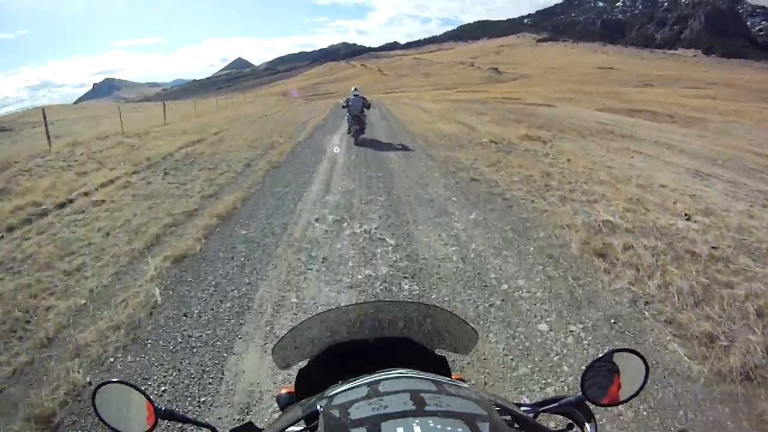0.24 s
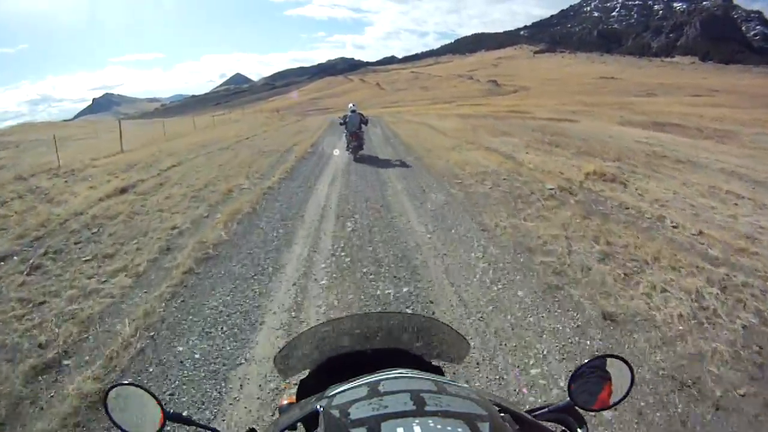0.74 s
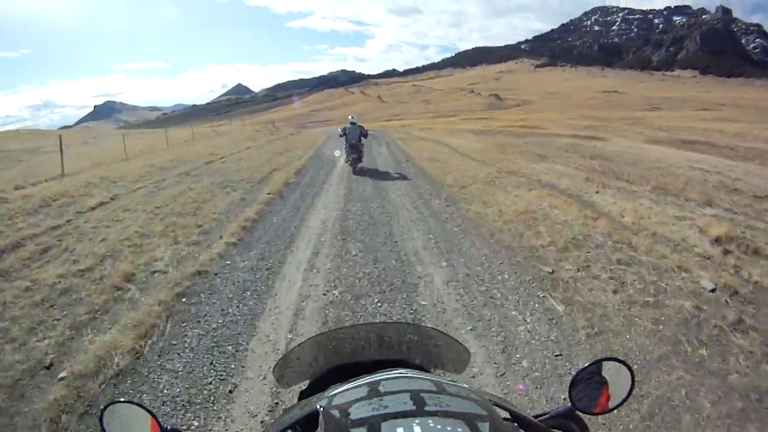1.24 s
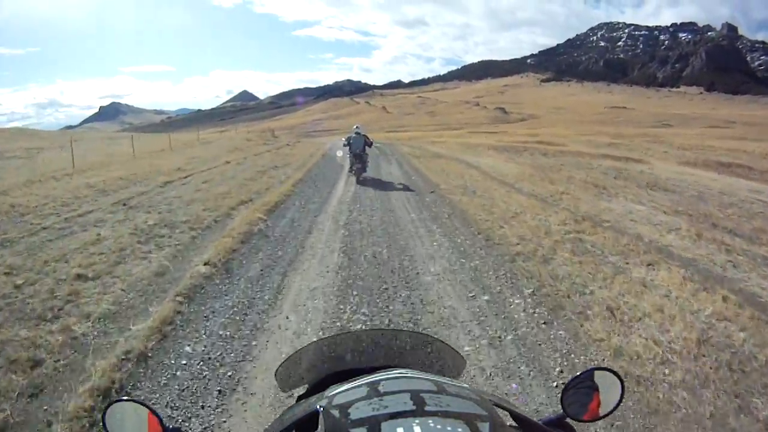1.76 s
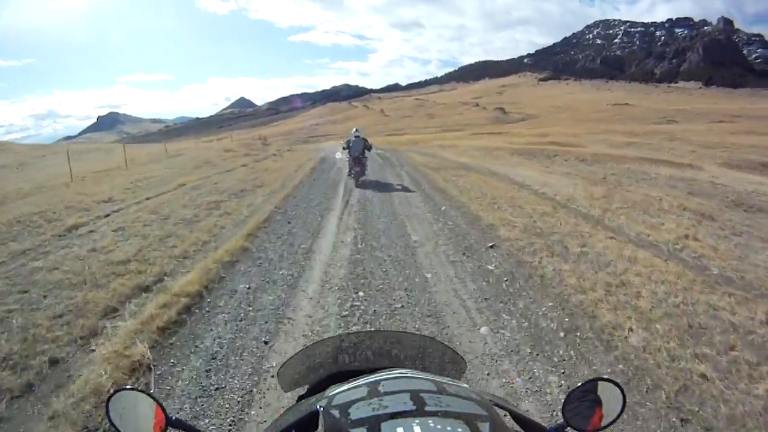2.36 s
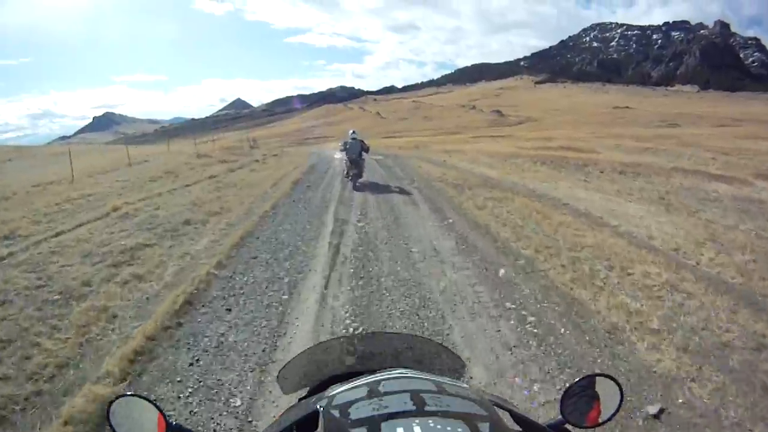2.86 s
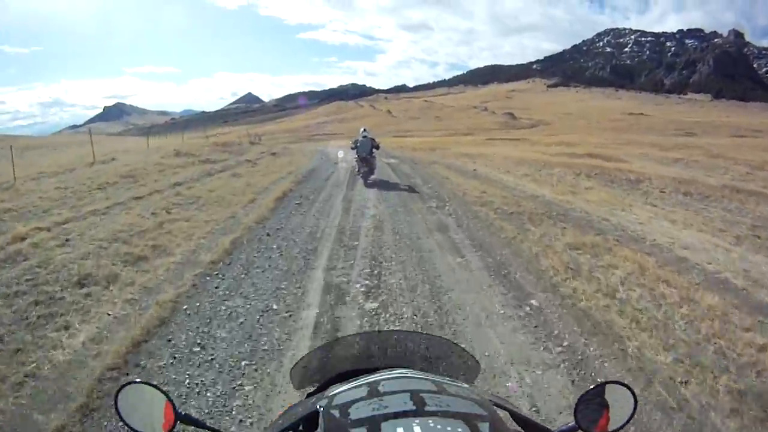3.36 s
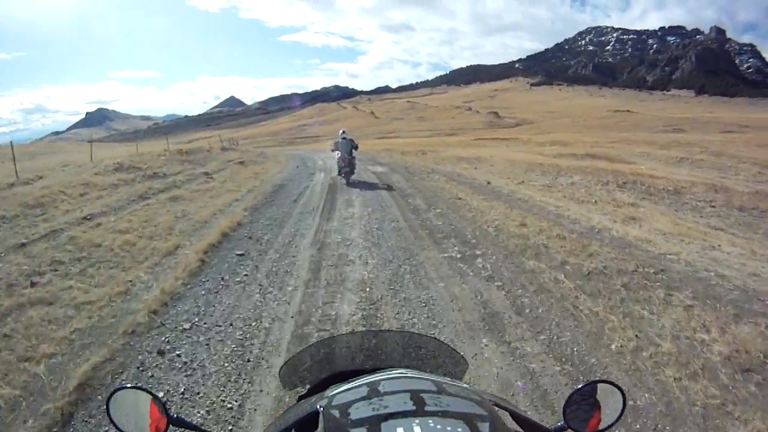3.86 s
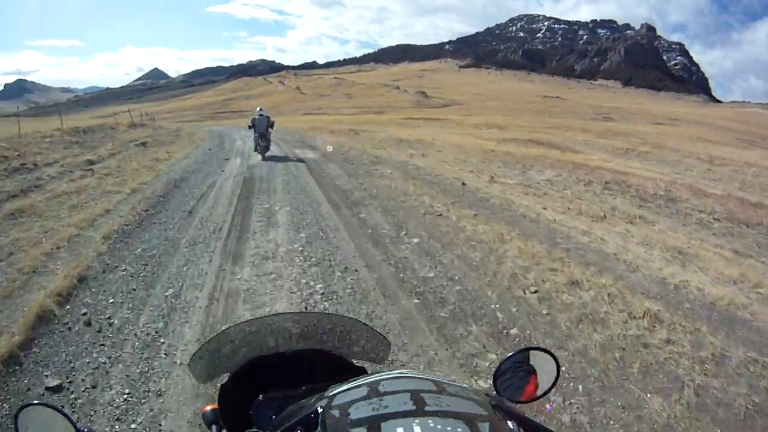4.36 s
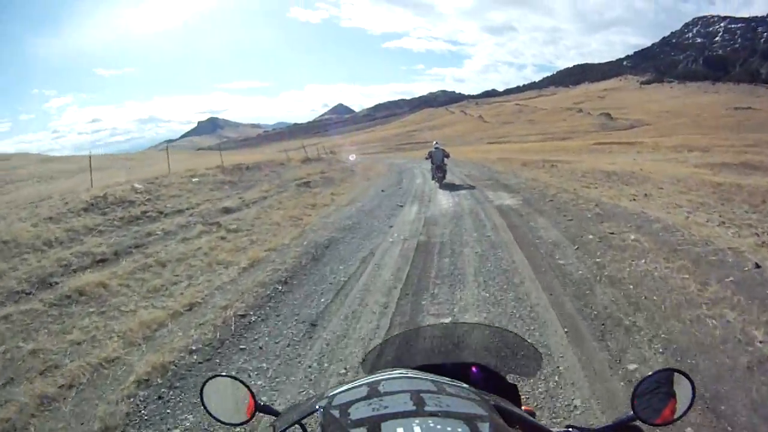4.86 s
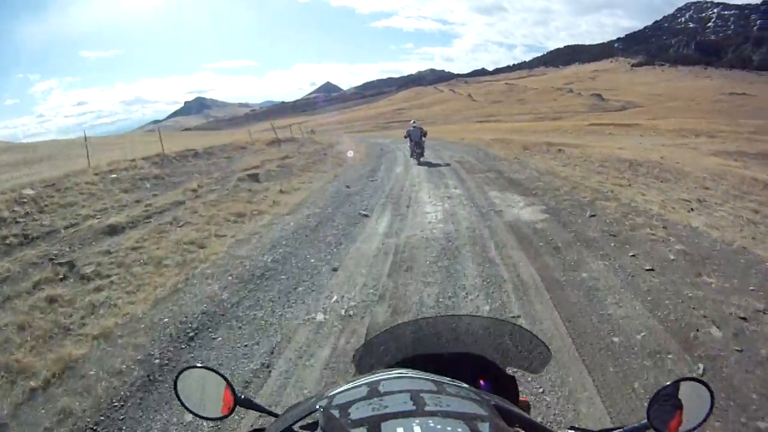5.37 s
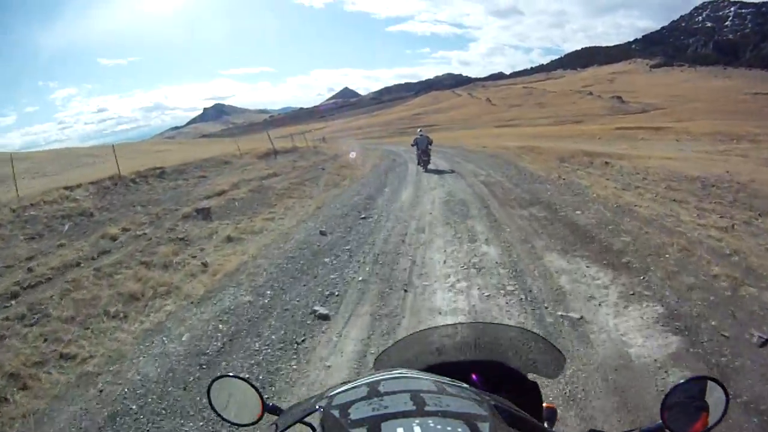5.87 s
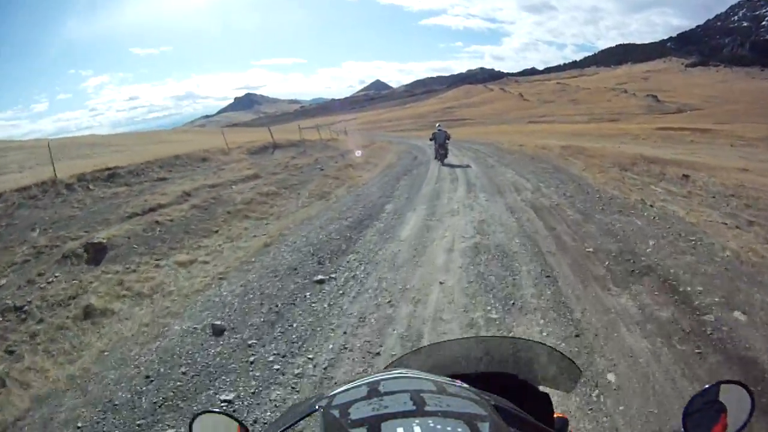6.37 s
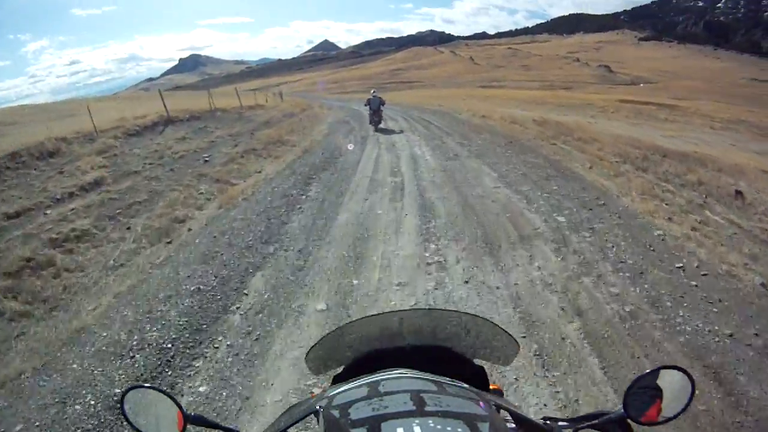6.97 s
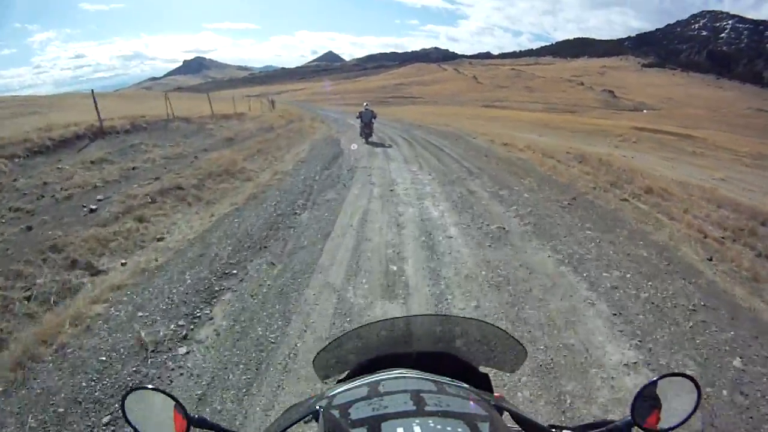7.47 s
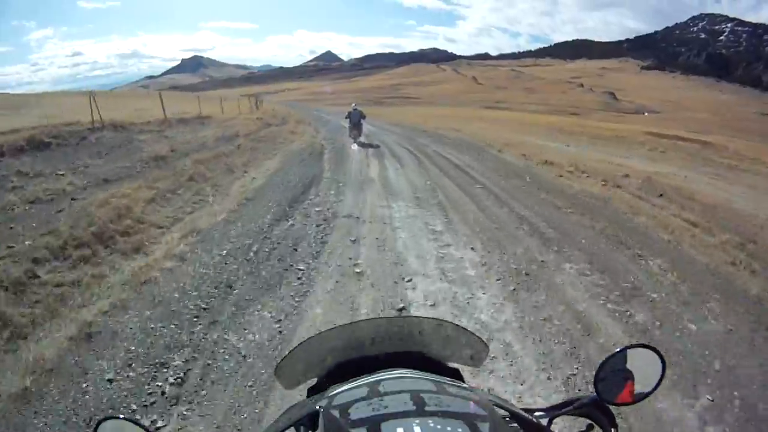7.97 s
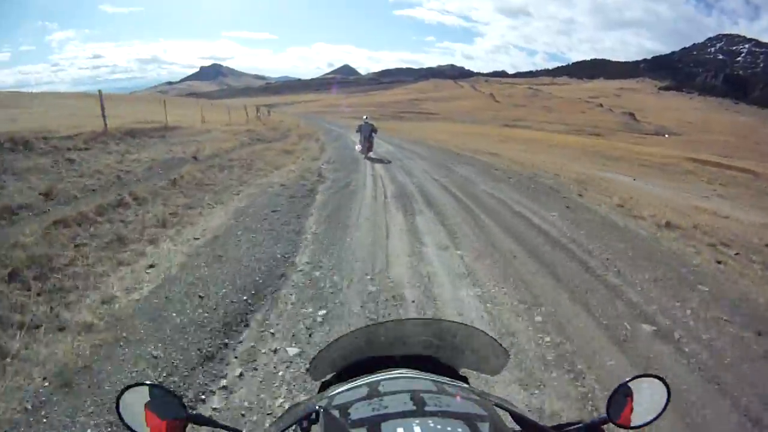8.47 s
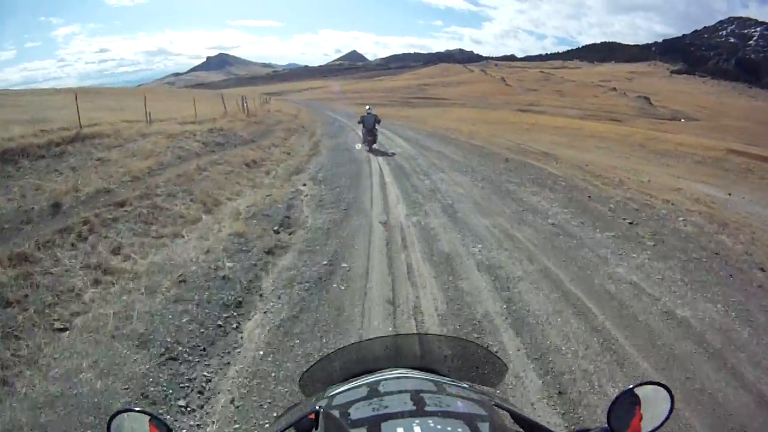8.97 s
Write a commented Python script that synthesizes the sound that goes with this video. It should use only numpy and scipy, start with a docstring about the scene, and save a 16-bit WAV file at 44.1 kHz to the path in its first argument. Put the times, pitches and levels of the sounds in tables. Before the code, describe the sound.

A single-cylinder motorcycle coasts with burbling, missed beats, then thumps harder through three barking throttle bursts over crunching gravel, heard from the rider's seat.

```python
"""On a gravel road in open country, from the rider's seat of a rolling single-cylinder motorcycle.
Close by, each four-stroke engine cycle gulps air in one thump that rings the intake duct and airbox;
it coasts with whining gears, burble and missed beats, then three throttle twists add a hard bark.
Under it the tyres crunch and flick stones, the bodywork drones and wind buffets the microphone.
A small camera turns its gain down under the thumps and clips the peaks."""
import sys
import numpy as np
from scipy import signal
from scipy.fft import rfft, irfft
from scipy.io import wavfile
from scipy.ndimage import uniform_filter1d

SR = 44100
rng = np.random.default_rng(int(sys.argv[2]) if len(sys.argv) > 2 else 0)


def dump(signal):
    """Clip the signal to [-1, 1] and save it as 16-bit WAV at the path in sys.argv[1]."""
    limited = np.clip(np.atleast_2d(signal).T, -1, 1)
    pcm = np.round(limited * 32767).astype(np.int16)
    wavfile.write(sys.argv[1], SR, pcm)


N = 406602

# Levels in the tables are those ahead of the camera's limiter.
# wind and rough road at the microphone: time_s, level_db
RUMBLE_LEVEL = [(0, -24), (3.0, -25), (4.3, -28.5), (6.2, -28), (7.2, -27.5), (8.4, -26), (8.75, -17.5),
                (9.22, -20.5)]
# its spectrum: frequency_hz, relative_density_db
RUMBLE_COLOUR = [(15, -9), (30, -3.5), (45, -4.5), (70, -4), (110, -2), (165, -9.5), (210, -12),
                 (280, -8.5), (400, -15), (800, -44.5)]
# drone of the bodywork: time_s, level_db
DRONE_LEVEL = [(0, -32.5), (1.85, -30.5), (2.2, -26.5), (2.7, -30.5), (5.9, -34), (6.5, -30.5), (7.8, -30),
               (9.22, -27.5)]
# its spectrum: frequency_hz, relative_density_db
DRONE_COLOUR = [(200, -14), (340, -12), (450, -0.5), (530, -2), (590, 3), (635, -3), (680, -10), (760, -10),
                (1000, -31)]
# spectrum of the tyre crunch: frequency_hz, relative_density_db
GRAVEL_COLOUR = [(300, -29.5), (700, 4.5), (920, 8), (1080, 4), (1300, 5), (1700, -1), (2300, -1),
                 (3000, -0.5), (3500, -10.5), (4100, -15), (5200, -14)]
# patches of loose gravel: centre_s, bell_width_s, added_db
LOOSE_PATCHES = [(1.18, 0.055, 3.5), (2.202, 0.31, 1.5), (3.99, 0.12, 6), (8.733, 0.08, 5.5)]
# stones flung against the bike: start_s, peak_db
STONES = [(0.2677, -19), (0.3686, -24.5), (0.4236, -21.5), (0.4777, -25), (0.7906, -22.5), (0.849, -26),
          (0.908, -31), (0.9335, -19.5), (2.9741, -22.5), (3.8561, -24), (3.9035, -34), (3.9402, -14),
          (3.995, -20), (4.0522, -22.5), (4.1165, -29), (4.2126, -23), (6.1064, -23), (6.3464, -37)]
# ring of metal under a stone: pitch_hz, mean_relative_level_db, t60_s
STONE_MODES = [(1250, -11, .008), (2150, 5, 0.0061), (2850, -15, .012), (3040, 12.5, 0.0096),
               (3700, -12, 0.0054), (4620, 1, 0.0065), (5000, -0.5, 0.012)]
# bumps that knock the bodywork: start_s, peak_db
KNOCKS = [(0.892, -19.5), (1.372, -14), (2.316, -23), (3.519, -11)]
# ring of the bodywork: pitch_hz, mean_relative_level_db, t60_s
PANEL_MODES = [(579, 5, 0.027), (726, -21, 0.03), (910, -11, 0.055), (1140, -10, 0.038), (1770, -19, 0.013)]
# gear whine while the wheel drives the engine: time_s, level_db
WHINE_LEVEL = [(0, -33.5), (1.3, -33.5), (1.8, -35), (2.5, -26.5), (3.0, -45), (4.2, -38.5), (4.6, -39),
               (9.22, -48)]
# gear partials: multiple_of_engine_cycle, relative_level_db ahead of the panel's boost
GEAR_ORDERS = [(34, -9), (35, -13), (36, 0), (37, -9), (38, -7), (44, -11), (48, -17)]
# exhaust burble, uneven about this level: time_s, mean_peak_db
BURBLE_LEVEL = [(0, -28.5), (1.15, -11), (2.2, -13), (4.0, -11.5), (4.5, -18), (8.3, -12.5), (9.22, -37)]
# engine speed: time_s, cycles_per_s
ENGINE_SPEED = [(0, 18.763), (.46, 17.437), (4.29, 13.264), (4.48, 14.8), (4.61, 13.005), (4.66, 14.8),
                (4.74, 13.86), (4.92, 14.728), (6.12, 16.052), (6.7, 17.37), (7.0, 17.431), (7.13, 18.388),
                (7.81, 19.82), (7.91, 21.005), (8.33, 23.176), (8.52, 23.574), (8.81, 21.64),
                (9.22, 22.864)]
# the rider's slow throttle setting: time_s, opening_0_to_1
THROTTLE = [(0, 0.06), (.85, 0.15), (1.1, 0), (2.4, 0), (3.2, 0.05), (4.1, 0.3), (4.42, 0.53), (6.2, 0.63),
            (6.45, .43), (7.8, 0.58), (8.35, 0.63), (8.6, 0.4), (8.8, 0.54), (9.22, 0.67)]
# twists of the grip on top of it: start_s, rise_s, hold_s, fall_s, added_opening_0_to_1
TWISTS = [(4.57, .04, .385, .04, .55), (6.66, .22, .345, .025, .41), (7.79, .2, .22, .23, .55)]
# missed beats: time_s, loss_db
MISSES = [(.22, 12), (.39, 20), (1.08, 9), (1.45, 15), (1.88, 26), (2.27, 3), (2.46, 19), (2.79, 15),
          (2.99, 14), (3.34, 4), (3.48, 17), (3.84, 14), (8.72, 9), (9.04, 12)]
# spectrum of the intake jet ahead of saturation: frequency_hz, relative_density_db
BARK_COLOUR = [(300, -33), (600, 7), (850, -0.5), (1200, 4), (1550, -1.5), (2050, 2), (2400, -4.5),
               (2900, 2), (3500, -6.5), (4200, -63), (5200, -30)]
# intake duct modes: mean_pitch_hz, relative_level_db, t60_s
DUCT_MODES = [(165, -17, .06), (286, 15.5, .042)]
# low ring of the airbox: time_s, level_db
BOOM_LEVEL = [(0, -4.5), (1.3, -3.5), (2.1, -3.5), (4.2, -2.5), (6.5, -1.5), (7.7, -4.5), (8.5, -11),
              (8.72, -5.5), (9.22, -0.5)]

MID_SPEED_HZ = 16   # engine cycles per second at which the speed laws add nothing
GRAVEL_DB, GRAVEL_DB_PER_OCTAVE = -40.5, 5   # at mid speed, and the rise as speed doubles
PANEL_HZ, PANEL_WIDTH_HZ, PANEL_BOOST_DB = 592, 14, 7.5   # resonance that takes up gear partials
CATCH_DB = 2.5   # the beat after a miss is this much stronger
THUMP_SHUT_DB, THUMP_OPEN_DB = -17.5, -1   # throttle shut and wide open
BARK_SHUT_DB, BARK_OPEN_DB = -35, -8   # likewise, the open level at mid speed
BARK_DB_PER_OCTAVE = 8   # rise of the open level as speed doubles
CRACK_DB, CRACK_T60_S = 6, .0016   # pressure front: level over the rasp with the throttle wide open
HOLD_BAND_HZ, CUTOFF_HZ = 5300, 15400   # camera low-passes, before and after the sample hold


def from_db(db):
    """Decibels to gain."""
    return 10 ** (np.asarray(db) / 20)


def rms_one(x):
    """Scale to unit rms."""
    return x / np.sqrt(np.mean(x ** 2) + 1e-20)


def in_time(rows):
    """Each column of a curve table, sample by sample."""
    s, *columns = np.transpose(rows)
    return [np.interp(np.arange(N) / SR, s, c) for c in columns]


def coloured(x, spectrum):
    """Give a signal a spectrum by a causal, minimum-phase filter; rms 1."""
    hz, db = np.transpose(spectrum)
    f = np.maximum(np.fft.rfftfreq(2 ** 14, 1 / SR), 1)
    octaves_beyond = np.abs(np.log2(f / np.clip(f, hz[0], hz[-1])))
    # past either end of the table: 12 dB per octave down, for four octaves
    shape_db = np.interp(np.log(f), np.log(hz), db) - 12 * np.minimum(octaves_beyond, 4)
    cepstrum = irfft(np.log(from_db(shape_db)))
    fold = np.r_[1, np.full(len(f) - 2, 2), 1, np.zeros(len(f) - 2)]   # makes it minimum phase
    impulse = irfft(np.exp(rfft(cepstrum * fold)))
    return rms_one(signal.fftconvolve(x, impulse)[:N])


def drift(rate_hz):
    """Smooth chance with spread 1, changing about rate_hz times a second."""
    spectrum = rfft(rng.standard_normal(N // 100 + 2))   # one point every 100 samples
    f = np.arange(len(spectrum)) * SR / N
    slow = rms_one(irfft(spectrum / (1 + (f / rate_hz) ** 2)))
    return np.interp(np.arange(N) / 100, np.arange(len(slow)), slow)


def bell(t, width):
    """A rounded pulse of height 1 at t = 0."""
    return np.exp(-.5 * (t / width) ** 2)


def dying(t, t60):
    """A decay that starts at t = 0 and falls 60 dB in t60 seconds."""
    return (t >= 0) * np.exp(-np.log(1000) * np.maximum(t, 0) / t60)


def rung(puff, t, hz, t60):
    """A cavity mode set ringing by a puff of air."""
    since = t - t[0]
    ring = dying(since, t60) * np.cos(2 * np.pi * hz * since)
    return np.convolve(puff / puff.sum(), ring)[:len(t)]


def add(track, start, sound):
    """Mix a sound into a track from the given sample on."""
    first, last = max(start, 0), min(start + len(sound), len(track))
    if last > first:
        track[first:last] += sound[first - start:last - start]


def rumble(lumpy_db=2.5):
    """Wind and the rough road buffet the microphone."""
    (rumble_db,) = in_time(RUMBLE_LEVEL)
    gain = from_db(rumble_db + lumpy_db * drift(37))
    return gain * coloured(rng.standard_normal(N), RUMBLE_COLOUR)


def bodywork(cycles, throb_db=3.5, throb_lead_cycles=0.021):
    """Engine and road shake the panels into a hollow drone that swells with every cycle."""
    (drone_db,) = in_time(DRONE_LEVEL)
    throb = throb_db * np.cos(2 * np.pi * (cycles + throb_lead_cycles))
    return from_db(drone_db + throb) * coloured(rng.standard_normal(N), DRONE_COLOUR)


def gravel(speed, grains_per_s=2500, size_db=0.5, hiss_share=0.9, patchy_db=2.5):
    """Countless small stones crack under the tyres, louder with speed and where they lie loose."""
    t = np.arange(N) / SR
    loose_db = sum(db * bell(t - s, width) for s, width, db in LOOSE_PATCHES)
    gravel_db = GRAVEL_DB + GRAVEL_DB_PER_OCTAVE * np.log2(speed / MID_SPEED_HZ) + loose_db
    sizes = from_db(size_db * np.minimum(rng.exponential(1, N), 5)) * rng.choice([-1, 1], N)
    grains = rms_one(sizes * (rng.random(N) < grains_per_s / SR))
    crunch = coloured(grains + hiss_share * rng.standard_normal(N), GRAVEL_COLOUR)
    return from_db(gravel_db + patchy_db * drift(28)) * crunch


def struck(hits, modes, scuff_t60, bounce_s, bounce_db):
    """Each hit scuffs and bounces three times, striking every mode with a strength of its own."""
    t, out = np.arange(SR // 12) / SR, np.zeros(N)
    for s, peak_db in hits:
        touches = np.r_[0, np.cumsum(bounce_s * rng.uniform(.5, 2, size=3))]
        scuffs = sum(from_db(bounce_db * k) * dying(t - at, scuff_t60) for k, at in enumerate(touches))
        contact = rng.standard_normal(len(t)) * scuffs
        body = 0
        for hz, db, t60 in modes:
            strength = from_db(db + rng.normal(0, 1))
            body = body + strength * dying(t, t60) * np.sin(2 * np.pi * hz * t)
        hit = signal.fftconvolve(contact, body)
        add(out, int(s * SR), from_db(peak_db) * hit / np.abs(hit).max())
    return out


def stones():
    """Flung stones tick against the metal, and bumps knock the panels."""
    ticks = struck(STONES, STONE_MODES, scuff_t60=0.019, bounce_s=0.0051, bounce_db=-5.5)
    knocks = struck(KNOCKS, PANEL_MODES, scuff_t60=0.0033, bounce_s=0.004, bounce_db=-5.5)
    return ticks + knocks


def whine(cycles, speed, whine_db, waver_rad=0.55):
    """Gear teeth mesh in step with the crank, wavering irregularly and swelling near a panel resonance."""
    teeth = 0
    for order, db in GEAR_ORDERS:
        boost_db = PANEL_BOOST_DB / (1 + ((order * speed - PANEL_HZ) / PANEL_WIDTH_HZ) ** 2)
        phase = 2 * np.pi * order * cycles + waver_rad * drift(5.1)
        teeth = teeth + from_db(db + boost_db) * np.sin(phase)
    return from_db(whine_db) * rms_one(teeth)


def burble(cycles, burble_db, pipe_hz=160, pipe_t60=0.049, puff_s=0.001, delay_s=0.0122,
           scatter_s=0.0014, uneven_db=3.0):
    """The exhaust answers each intake stroke with an uneven pop that rings the pipe."""
    t, out = np.arange(-SR // 200, SR // 10) / SR, np.zeros(N)
    pop = rung(bell(t[t < -t[0]], puff_s), t, pipe_hz, pipe_t60)
    pop = pop / np.abs(pop).max()
    firings = np.flatnonzero(np.diff(np.floor(cycles)))
    for at, chance in zip(firings, rng.standard_normal((len(firings), 2))):
        start = at + int((t[0] + delay_s + scatter_s * chance[0]) * SR)
        add(out, start, from_db(burble_db[at] + uneven_db * chance[1]) * pop)
    return out


def throttle_opening():
    """The rider's hand: a slow setting plus quick twists, each with a rise, a hold and a fall."""
    (opening,), t = in_time(THROTTLE), np.arange(N) / SR
    for start, rise, hold, fall, added in TWISTS:
        corners = start + np.cumsum([0, rise, hold, fall])
        opening = opening + added * np.interp(t, corners, [0, 1, 1, 0])
    return np.clip(opening, 0, 1)


def beat_strength(cycles, throttle, shut_scatter_db=7.3):
    """Strength of each beat in dB: uneven on a shut throttle; after a miss the engine catches harder."""
    beat = np.round(cycles).astype(int)
    missed_db = np.zeros(beat[-1] + 2)
    for s, loss_db in MISSES:
        k = beat[int(s * SR)]
        missed_db[k:k + 2] = -loss_db, CATCH_DB
    scatter_db = shut_scatter_db * (1 - throttle) ** 4 * rng.standard_normal(N)[beat]
    return missed_db[beat] + scatter_db


def bark(cycles, speed, throttle, beat_db, burst_s=0.0011, late_s=0.0009, echo_s=0.0041, echo_db=-13,
         tail_db=-21, tail_t60=0.061, draw_s=0.0055, draw_db=-24, beat_share=0.61, crack_lead_s=0.000975):
    """Air hisses past the throttle plate, cracks and rasps at each thump, and returns once by the duct."""
    open_db = BARK_OPEN_DB + BARK_DB_PER_OCTAVE * np.log2(speed / MID_SPEED_HZ)
    bark_db = BARK_SHUT_DB + (open_db - BARK_SHUT_DB) * throttle ** 2.0 + beat_share * beat_db
    since = (cycles - np.round(cycles)) / speed - late_s   # seconds from the nearest rasp
    rasp = bell(since, burst_s) + from_db(echo_db) * bell(since - echo_s, burst_s)
    hiss = from_db(draw_db) * bell(since, draw_s) + from_db(tail_db) * dying(since, tail_t60)
    # the jet saturates, so the rasps are even
    jet = rms_one(np.tanh(coloured(rng.standard_normal(N), BARK_COLOUR)))
    # a steep pressure front leads the rasp
    crack = from_db(CRACK_DB) * throttle * dying(since + crack_lead_s, CRACK_T60_S)
    return from_db(bark_db) * ((rasp + hiss) * jet + crack)


def intake(cycles, speed, throttle, beat_db, speed_law=0.17, gulp_s=0.00092, gulp_lead_s=0.0018,
           shut_stretch=0.24, open_sharpen=0.06, rebound_s=0.0018, rebound_db=-4, crest_s=0.00034,
           crest_db=-7, boom_hz=72, boom_t60=0.13, boom_lead_s=0.00083, uneven_db=1.15, detune=0.025):
    """Each cycle the piston gulps air, ringing the duct; the valve shuts and air rebounds to the airbox."""
    (boom_db,) = in_time(BOOM_LEVEL)
    strength = from_db(THUMP_SHUT_DB) * (1 - throttle) + from_db(THUMP_OPEN_DB) * throttle
    before, after = int(.012 * SR), int(.11 * SR)
    t, out = np.arange(-before, after) / SR, np.zeros(N)
    near = t[:2 * before]   # the span of a puff
    firings = np.flatnonzero(np.diff(np.floor(cycles)))
    for at, chance in zip(firings, rng.standard_normal((len(firings), 3))):
        stroke = (MID_SPEED_HZ / speed[at]) ** speed_law   # a faster piston gulps more briefly
        stretch = stroke * (1 + shut_stretch * (1 - throttle[at]))   # a shut throttle draws it out
        wide_open = throttle[at] ** 3
        gulp = bell(t + gulp_lead_s * stretch, gulp_s * stretch)
        # the suction on the duct is quicker when wide open
        suction = bell(near + gulp_lead_s, gulp_s * stroke * (1 - open_sharpen * wide_open))
        duct = 0
        for hz, db, t60 in DUCT_MODES:
            duct = duct + from_db(db) * rung(suction, t, hz * (1 + detune * chance[0]), t60)
        crest = wide_open * from_db(crest_db) * bell(t, crest_s)   # an open throttle steepens the rebound
        rebound = from_db(rebound_db) * bell(t, rebound_s) + crest
        beat_gain = strength[at] * from_db(beat_db[at] + uneven_db * chance[1])
        thump = beat_gain * (rebound - gulp - duct)
        boom_puff = bell(near + boom_lead_s, rebound_s)
        airbox = rung(boom_puff, t, boom_hz * (1 + detune * chance[2]), boom_t60)
        add(out, at - before, thump + from_db(boom_db[at]) * airbox)
    return out


def scene():
    """Engine, road and wind, all close by in open country with no echo off the surroundings."""
    (speed,), (whine_db,), (burble_db,) = in_time(ENGINE_SPEED), in_time(WHINE_LEVEL), in_time(BURBLE_LEVEL)
    cycles, throttle = np.cumsum(speed) / SR, throttle_opening()
    beat_db = beat_strength(cycles, throttle)
    engine = intake(cycles, speed, throttle, beat_db) + bark(cycles, speed, throttle, beat_db)
    engine = engine + burble(cycles, burble_db)
    machine = whine(cycles, speed, whine_db) + bodywork(cycles)
    return (engine + machine + gravel(speed) + stones() + rumble())[None]


def limiter(x, threshold_db=-6.0, share=0.77, release_db_per_s=25, attack_s=0.0021, sense_s=0.0017):
    """Loud thumps turn everything down and the gain creeps back; the briefest peaks slip through."""
    level = uniform_filter1d(np.abs(x).max(axis=0), max(int(sense_s * SR), 1))
    over_db = share * np.maximum(20 * np.log10(np.abs(level) + 1e-9) - threshold_db, 0)
    creep_db = release_db_per_s * np.arange(N) / SR
    cut_db = np.maximum.accumulate(over_db + creep_db) - creep_db
    return x * from_db(-uniform_filter1d(cut_db, max(int(attack_s * SR), 1)))


def record(dry):
    """The camera limits, clips and holds samples at 12 kHz, mirroring the sound faintly around 12 kHz."""
    clipped = np.clip(limiter(dry), -1, 1)
    band_limit = signal.cheby1(7, .5, HOLD_BAND_HZ, fs=SR, output="sos")
    narrow = signal.sosfilt(band_limit, clipped)
    at_48k = signal.resample_poly(narrow, 160, 147, axis=1)
    held = np.repeat(at_48k[:, ::4], 4, axis=1)   # every fourth sample, held for four
    wide = signal.resample_poly(held, 147, 160, axis=1)[:, :N]
    return signal.sosfilt(signal.ellip(8, .3, 70, CUTOFF_HZ, fs=SR, output="sos"), wide)


dry = scene()
out = record(dry)
dump(out)
```